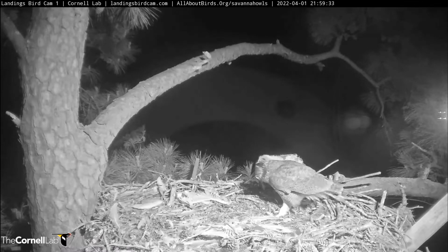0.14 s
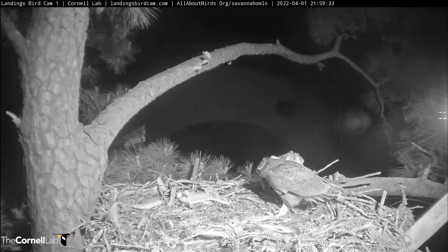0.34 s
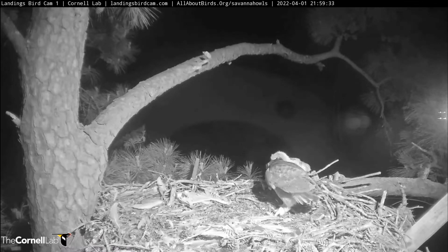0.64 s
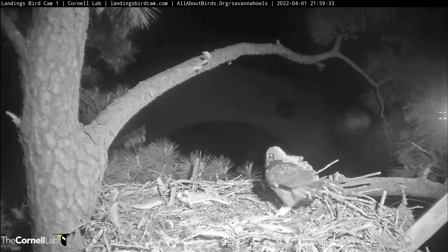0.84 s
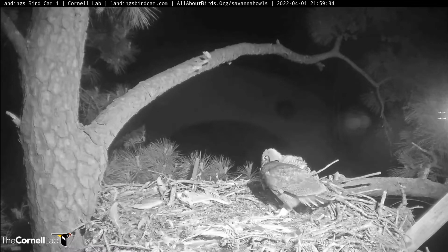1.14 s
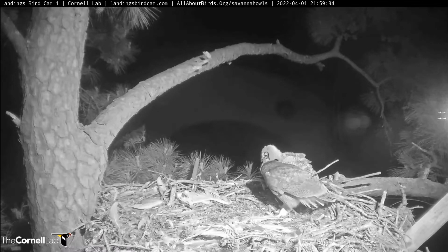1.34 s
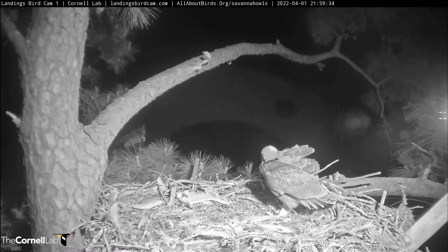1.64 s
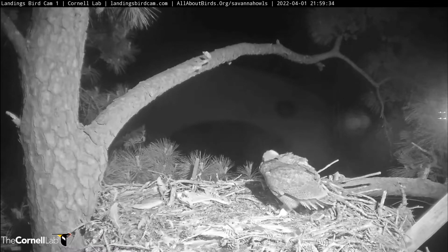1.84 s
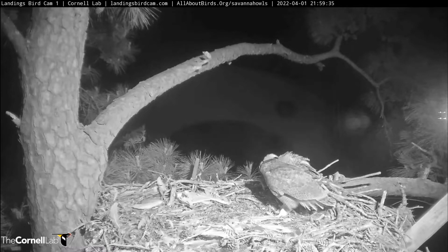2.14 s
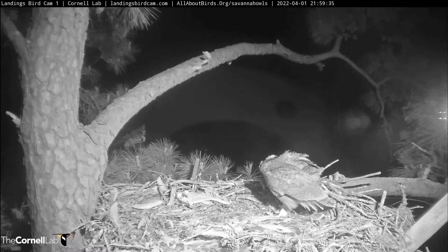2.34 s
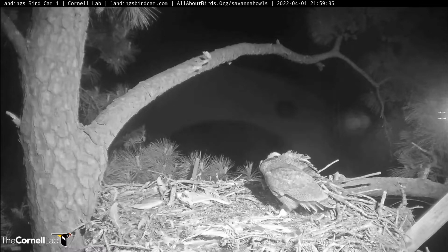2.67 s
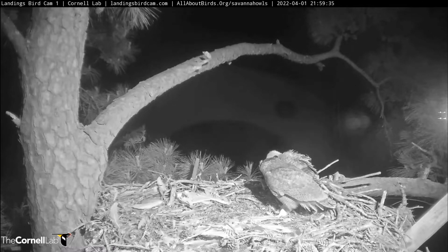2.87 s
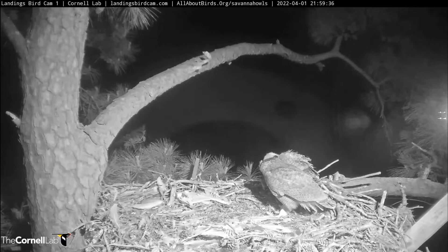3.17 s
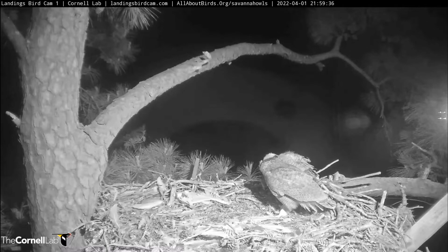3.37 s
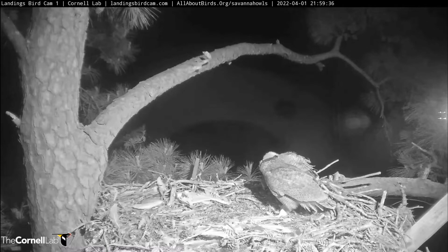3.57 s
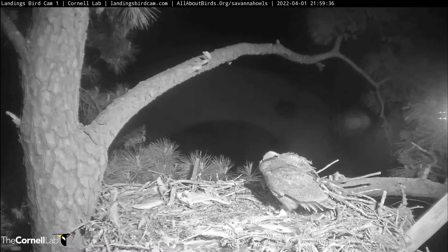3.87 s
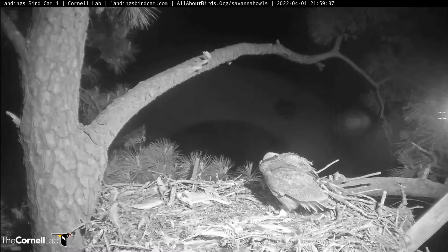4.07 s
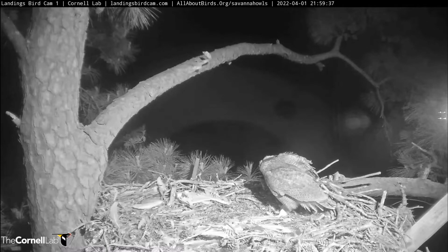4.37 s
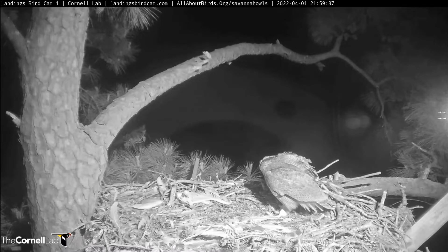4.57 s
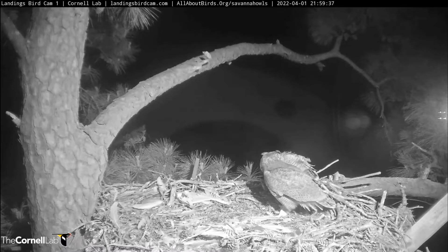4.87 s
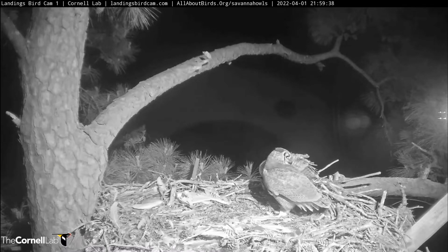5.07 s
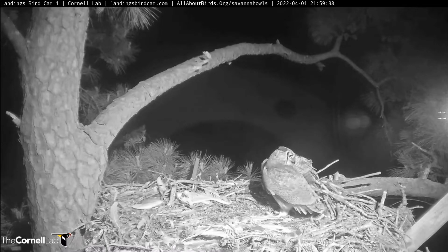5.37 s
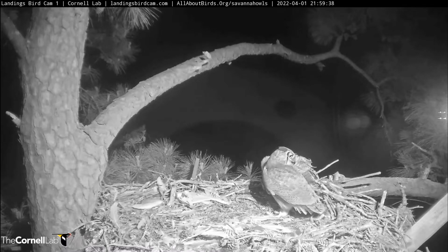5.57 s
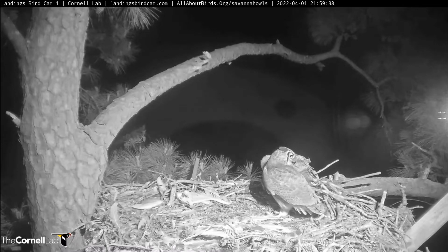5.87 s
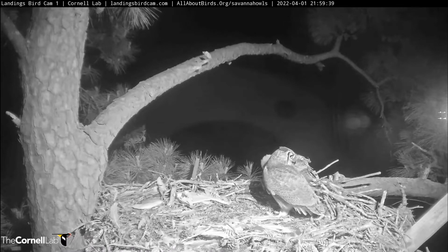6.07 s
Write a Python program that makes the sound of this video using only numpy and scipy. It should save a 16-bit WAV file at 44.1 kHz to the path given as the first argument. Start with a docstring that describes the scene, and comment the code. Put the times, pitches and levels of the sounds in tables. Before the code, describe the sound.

A young owl in a stick nest begs close to the microphone at night. After faint feather and twig rustles and a tiny tick comes a half-second screech, a steady whistle wrapped in rough hiss. A long quiet follows, then another small rustle and a second, harsher screech, and a third at the very end. Far tyre noise, a thin high machine whine and low electrical hum lie beneath, dipping after calls.

```python
"""Three rasping screeches: a young owl begs from a stick nest at night, close to the microphone.
Each is a low whistle and a rough upper tone, as from the two sides of the syrinx, wrapped in coloured hiss.
Echoes off nest and tree thicken it; brief noise strokes and a tick stir the twigs.
Behind lie still air, far tyre noise and a machine's whine, built from shaped noise and harmonics.
A gain control ducks under each call; hum, faint hiss and a very faint bright tick in the second are added."""
import sys
import numpy as np
from scipy import signal
from scipy.fft import rfft, irfft
from scipy.io import wavfile
from scipy.ndimage import uniform_filter1d, map_coordinates

SR = 44100
rng = np.random.default_rng(int(sys.argv[2]) if len(sys.argv) > 2 else 0)


def file_out(sig):
    """Save sig as 16-bit WAV at sys.argv[1]."""
    # one column per channel
    cols = np.atleast_2d(sig).T
    # limit, then scale
    lim = np.clip(cols, -1, 1)
    pcm = np.round(lim * 32767).astype(np.int16)
    wavfile.write(sys.argv[1], SR, pcm)


N = 273861
TIME = np.arange(N) / SR

# pitches of the slack syrinx, where every screech starts and ends
SLACK_WHISTLE_HZ, SLACK_UPPER_HZ = 880, 2215


def from_db(db):
    """Decibels to gain."""
    return 10 ** (np.asarray(db) / 20)


def rms_one(x):
    """Scale to unit power."""
    return x / np.sqrt(np.mean(x ** 2) + 1e-20)


def in_time(rows):
    """Columns of a curve at every sample."""
    s, *columns = np.transpose(rows)
    return [np.interp(TIME, s, c) for c in columns]


def at_hz(points, hz):
    """Level of a resonance curve at a pitch, in dB."""
    return np.interp(hz, *np.transpose(points))


def bell(centre_s, spread_s):
    """Smooth swell with a peak of 1; the spread is the standard deviation."""
    return np.exp(-.5 * ((TIME - centre_s) / spread_s) ** 2)


def noise(spectrum):
    """Noise with a given colour, falling away further above its last point; rms 1."""
    hz, db = np.transpose(spectrum)
    f = np.maximum(np.fft.rfftfreq(N, 1 / SR), 1)
    colour = from_db(np.interp(np.log(f), np.log(hz), db))
    shape = colour / (1 + (f / (2 * hz[-1])) ** 2)
    return rms_one(irfft(rfft(rng.standard_normal(N)) * shape, N))


def drift(rate):
    """Slow chance with about `rate` turns a second; rms 1."""
    f = np.fft.rfftfreq(N, 1 / SR)
    return rms_one(irfft(rfft(rng.standard_normal(N)) / (1 + (f / rate) ** 2), N))


def phase_of(hz):
    """Running phase of a moving pitch, from a random start."""
    return 2 * np.pi * (np.cumsum(hz) / SR + rng.random())


def screech(sum_db=-9, difference_db=-11, octave_db=-31, harsh_db=-8, hiss_follow=.35):
    """Two coupled oscillators give sum and difference tones; air rushing past them hisses."""
    # the whistle is strongest near its own resonance: f/Hz, level/dB
    whistle_resonance = [(890, -24), (925, -13), (960, -3), (1050, -3), (1140, -2), (1190, -6.5),
                         (1260, -13.5)]
    # its overtone comes out on climbing into the throat resonance: f of overtone/Hz, level/dB
    overtone = [(2000, -40), (2370, -31.5), (2490, -11)]
    # colour of the throat hiss: f/Hz, relative level per Hz/dB
    throat = [(500, -23), (1400, -21), (1900, -14.5), (2300, -16), (2600, -2.5), (2900, 5.5), (3400, -2),
              (3850, -6.5), (4300, -12.5), (5000, -17.5), (5600, -22.5), (6800, -26.5), (8000, -42)]
    # broader hiss of the harshest moments: f/Hz, relative level per Hz/dB
    harsh = [(700, -13.5), (1700, 5), (2300, 9), (4200, -6), (5100, 0), (5600, -21.5), (7000, -26.5)]
    beak_band_hz = [2480, 4200]   # where the beak radiates the side tones
    slack_flutter_db, slack_span_hz = 4, 80

    breath, low_hz, low_db, high_hz, high_db, rough, rush_db = begging()
    low = phase_of(low_hz * (1 + .006 * drift(90)))
    high = phase_of(high_hz * (1 + .007 * drift(70) + .06 * rough * drift(450)))

    # the whistle is less steady near its slack pitch
    voiced = from_db(at_hz(whistle_resonance, low_hz)) * np.sin(low)
    voiced = voiced + from_db(at_hz(overtone, 2 * low_hz)) * np.sin(2 * low)
    slack = np.exp((SLACK_WHISTLE_HZ - low_hz) / slack_span_hz)
    whistle = from_db(low_db + (1.0 + slack_flutter_db * slack) * drift(58)) * voiced

    # coupling grows with tension and comes and goes, so the side tones are hoarser than the main one
    tension = high_hz / 3600
    coupling = tension * rms_one(1 + .45 * drift(300))
    sides = from_db(sum_db) * np.sin(high + low) + from_db(difference_db) * np.sin(high - low)
    beak = signal.butter(3, beak_band_hz, "band", fs=SR, output="sos")
    sides = signal.sosfilt(beak, coupling * sides)
    octave = coupling * from_db(octave_db) * np.sin(2 * high)
    flutter = rms_one(from_db((1.3 + 3 * rough) * drift(110)))
    upper = from_db(high_db) * flutter * (np.sin(high) + sides + octave)

    # reading the hiss faster or slower moves its resonances with the tension
    rush = map_coordinates(noise(throat), [np.cumsum(tension ** hiss_follow)], order=3, mode="wrap")
    # it broadens as the voice roughens
    rush = rush + from_db(harsh_db) * rough * noise(harsh)
    hiss = from_db(rush_db + 0.18 * drift(90)) * rush
    return breath * (np.sqrt(2) * (whistle + upper) + hiss)


def begging():
    """The controls of all screeches in turn; each takes over at its start."""
    # screeches, levels relative: start t/s, length/s, attack/s, let-go/s, whistle f/Hz, climb/(Hz/s),
    # rise time constant/s, whistle level/dB, upper tone level/dB, hiss level/dB, hiss sag/(dB/s)
    screeches = [ (0.774, 0.467, 0.011, .072, 1127, 265.5, .061, -43, -39.5, -52.5, -12),
                 (3.374, 0.467, 0.027, .056, 1141, -260, .125, -40.5, -42, -51, 0.5),
                 (6.07, 0.46, 0.033, .06, 1129, -2, .23, -38, -46, -58.5, 2), ]
    # held upper tone, one curve per screech; it breaks up and clears: t/s, f/Hz, roughness (clipped to 0-1)
    upper_curves = [
        [(.786, 3370, .02), (.803, 3480, 0.58), (.87, 3424, 0.88), (.93, 3403, .42), (1.0, 3248, .15),
         (1.06, 3358, 0.19), (1.095, 3800, .35), (1.16, 3975, 0.17), (1.2, 3735, .7)],
        [(3.382, 3897, 0.4), (3.405, 3826, 0.92), (3.54, 3904, 1.0), (3.62, 3960, 0.31), (3.72, 3925, 0.34),
         (3.79, 3946, 0.44), (3.82, 3850, 0.29)],
        [(6.085, 3027, 0.9), (6.125, 2975, 1.1), (6.148, 2925, 0.6), (6.18, 3500, .95)],
    ]
    controls = syrinx(screeches[0], upper_curves[0])
    for call, upper in zip(screeches[1:], upper_curves[1:]):
        controls = np.where(TIME >= call[0], syrinx(call, upper), controls)
    return controls


def syrinx(call, upper):
    """Controls of one screech: both tones slide from slack, hold and drop back as the tension is let go."""
    # the upper tone is strongest near its own resonances: f/Hz, level/dB
    upper_resonance = [(2230, -8), (2700, 3.5), (3000, -0.5), (3300, 3), (3950, -2.5)]
    onset_db, onset_s = -0.5, .06   # the breath opens slightly held back
    sag_db_per_s, release_s = 4.5, 0.028
    upper_rise_hz_per_s = 60000
    linger_s = .004   # the upper tone stays slack this long at both ends
    slack_hiss_db = -10   # little air hisses past while it is slack
    rough_loss_db = 17.5   # a fully rough upper tone is this much weaker

    start, length, attack, let_go, top_hz, climb, rise, whistle_db, tone_db, hiss_db, hiss_sag = call
    t = np.clip(TIME - start, 0, length)
    tense = np.clip((length - linger_s - t) / let_go, 0, 1)
    breath = np.minimum(t / attack, 1) * np.minimum((length - t) / release_s, 1)
    breath = breath * from_db(onset_db * np.exp(-t / onset_s) - sag_db_per_s * t)

    held_hz, rough = in_time(upper)
    rough = np.clip(rough, 0, 1)
    reach = held_hz - SLACK_UPPER_HZ
    low_hz = SLACK_WHISTLE_HZ + (top_hz + climb * t - SLACK_WHISTLE_HZ) * np.tanh(t / rise) * tense
    risen = np.tanh(upper_rise_hz_per_s * np.maximum(t - linger_s, 0) / reach) * tense
    high_hz = SLACK_UPPER_HZ + reach * risen

    rush_db = hiss_db - hiss_sag * t + slack_hiss_db * (1 - risen) ** 2
    high_db = tone_db + at_hz(upper_resonance, high_hz) - rough_loss_db * rough
    return np.array([breath, low_hz, np.full(N, whistle_db), high_hz, high_db, rough, rush_db])


def among_trees(x, echo_db=-18, t60=0.18, dull_hz=3000):
    """Near bounces comb the rasp into layers; trunk, limbs and needles scatter a short, dull tail."""
    # bounces off the nest, limb and trunk: delay t/s, level/dB
    bounces = [(.00385, -28.5), (.00485, -15.5), (.0074, -26), (0.0105, -7.5)]
    bounce = sum(from_db(db) * np.interp(TIME - delay, TIME, x) for delay, db in bounces)
    t = TIME[:SR // 2]
    scatter = rng.standard_normal(len(t)) * from_db(-60 * t / t60) * (t > .004)
    scatter = signal.sosfilt(signal.butter(1, dull_hz, fs=SR, output="sos"), scatter)
    scatter = rms_one(scatter) / np.sqrt(len(t))   # unit energy
    return x + bounce + from_db(echo_db) * signal.fftconvolve(x, scatter)[:N]


def nest(grain_db=3, tick_s=.0015):
    """Grainy brushing of feathers on sticks, and the decaying noise tick of a dry twig."""
    # feathers and twigs brushing: t/s, level/dB, spread/s
    rustles = [(0.57, -78.5, 0.0042), (0.576, -65, 0.0046), (0.66, -61, 0.007), (2.334, -59, 0.015),
               (2.363, -53.5, 0.0082), (2.402, -59, 0.019)]
    # colour of the brushing: f/Hz, relative level per Hz/dB
    brushing = [(300, -21), (750, 19.5), (1500, 1), (2500, 3.5), (3700, 8.5), (5000, -1.5), (6500, -15),
                (8000, -37)]
    # twig ticks: t/s, level before halving/dB, f/Hz
    twig = [(0.696, -48, 4730)]
    strokes = sum(from_db(db) * bell(s, spread) for s, db, spread in rustles)
    out = strokes * noise(brushing) * rms_one(from_db(grain_db * drift(260)))
    for s, db, hz in twig:
        crack = noise([(.8 * hz, -30), (hz, 0), (1.35 * hz, -8), (1.6 * hz, -30)])
        decay = (TIME >= s) * np.exp(-np.abs(TIME - s) / tick_s)
        out = out + from_db(db) * crack * decay / 2
    return out


def night(air_db=-62, road_db=-60.5, swell_db=1.33, machine_hz=118.24, drone_db=-75.5):
    """Still air, a far road's tyre noise, one passing vehicle and a machine wavering with distance."""
    # colour of the night air and far traffic: f/Hz, relative level per Hz/dB
    air = [(20, -92), (55, -91.5), (90, -92), (160, -95), (300, -98.5), (600, -100), (1300, -99),
           (1550, -100), (2000, -102.5), (2700, -99), (3200, -97.5), (3700, -104), (4500, -104.5),
           (5200, -113), (6600, -115)]
    # colour of the road's tyre noise: f/Hz, relative level per Hz/dB
    road_colour = [(500, -26.5), (700, -16.5), (820, -1.5), (900, -3), (980, 6), (1070, 5), (1140, -3.5),
                   (1300, -9), (1700, -40)]
    # swells of the tyre noise: t/s, rise/dB, spread/s
    swells = [(0.05, 2, 0.64), (2.35, 3.5, 0.051), (2.949, 2.5, 0.22), (4.873, 4.5, 0.061),
              (6.2, 2.5, 0.29)]
    # one far vehicle passes with a lower tyre whine: t/s, level/dB, spread/s
    passing = [(2.801, -68, 0.38)]
    # colour of that whine: f/Hz, relative level per Hz/dB
    tyre_whine = [(500, -45.5), (680, -13), (740, -2.5), (790, -1), (850, -12), (1100, -45.5)]
    # partials of the far machine: multiple of its base pitch, rms level/dB
    machine = [(3, -84.5), (4, -79.5), (5, -79), (9, -68), (15, -84.5), (16, -86.5), (17, -89), (19, -86.5),
               (20, -74), (21, -92.5), (24, -64), (27, -76), (28, -76)]

    swells_db = sum(db * bell(s, spread) for s, db, spread in swells)
    road = from_db(road_db + swells_db + swell_db * drift(10)) * noise(road_colour)
    turn = phase_of(machine_hz * (1 + .0005 * drift(2)))
    whine = 0
    for k, db in machine:
        partial = np.sin(round(k) * turn + 2 * np.pi * rng.random())
        whine = whine + from_db(db + .8 * drift(6)) * partial
    drone = from_db(drone_db + 3.3 * drift(4)) * np.sin(turn)
    tyres = sum(from_db(db) * bell(s, spread) for s, db, spread in passing) * noise(tyre_whine)
    return from_db(air_db) * noise(air) + road + tyres + np.sqrt(2) * (whine + drone)


def scene(owl_db=3.5):
    """Owl, nest and night at one microphone that feeds both channels."""
    mono = from_db(owl_db) * among_trees(screech()) + nest() + night()
    return np.array([mono, mono])


def gain_control(x, threshold_db=-47, depth_db=5.5, release_db_per_s=15, attack_s=0.035):
    """Loud sound turns the gain down quickly, by a limited amount; it creeps back afterwards."""
    power = uniform_filter1d(x[0] ** 2, SR // 200)   # over 5 ms
    level = 10 * np.log10(np.maximum(power, 1e-12))
    cut = np.clip(level - threshold_db, 0, depth_db)
    recovery = release_db_per_s * TIME
    held = np.maximum.accumulate(cut + recovery) - recovery
    r = np.exp(-1 / (attack_s * SR))
    return x * from_db(-signal.lfilter([1 - r], [1, -r], held))


def record(dry, band_edge_hz=6926, mains_hz=60, hiss_floor_db=-96, cutoff_hz=15700):
    """Gain control and a narrow audio band, then mains hum, a very faint bright tick and electronic hiss."""
    # hum on the line: multiple of the mains frequency, rms level/dB
    mains = [(1, -63), (2, -74), (3, -92)]
    # colour of the faint bright tick: f/Hz, relative level per Hz/dB
    tick_colour = [(3000, -12), (7800, 4), (12000, -10), (15000, -15)]
    # one very faint, bright tick of noise during the second screech
    tick_s, tick_db, tick_decay_s = 3.394, -58, 0.00037

    band = signal.butter(24, band_edge_hz, fs=SR, output="sos")
    narrow = signal.sosfilt(band, gain_control(dry))
    hum = sum(np.sqrt(2) * from_db(db) * np.cos(2 * np.pi * round(k) * mains_hz * TIME) for k, db in mains)
    decay = (TIME >= tick_s) * np.exp(-np.abs(TIME - tick_s) / tick_decay_s)
    tick = from_db(tick_db) * noise(tick_colour) * decay
    mixed = narrow + hum + tick + from_db(hiss_floor_db) * rng.standard_normal(N)
    return signal.sosfilt(signal.ellip(10, .1, 80, cutoff_hz, fs=SR, output="sos"), mixed)


dry = scene()
out = record(dry)
file_out(out)
```